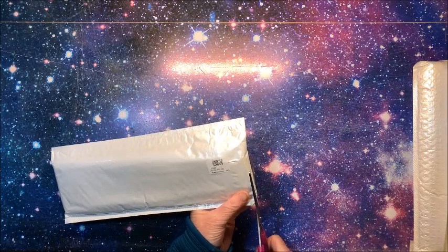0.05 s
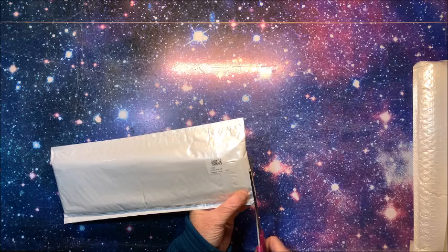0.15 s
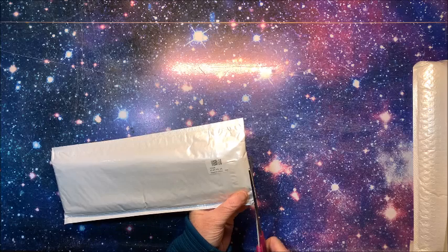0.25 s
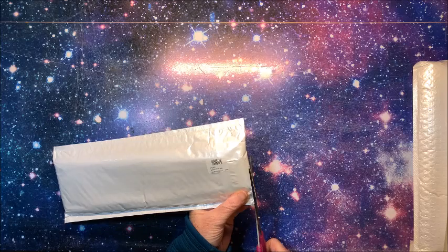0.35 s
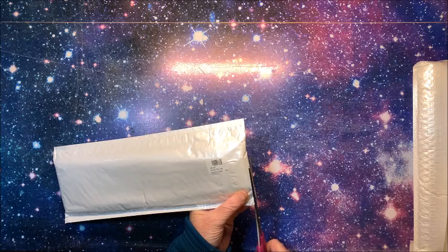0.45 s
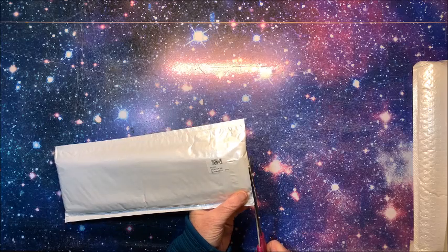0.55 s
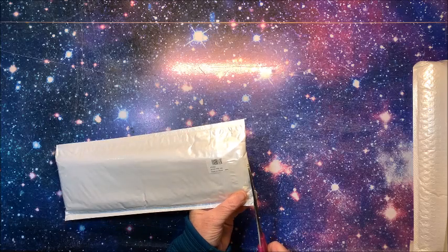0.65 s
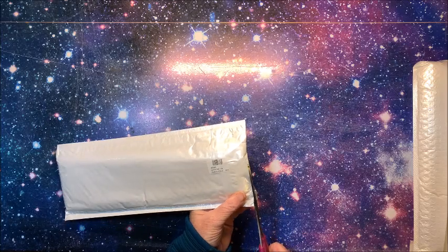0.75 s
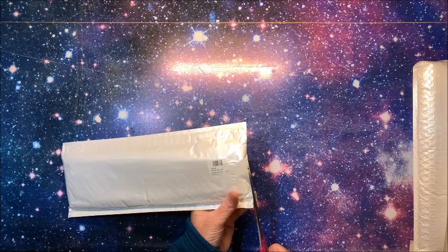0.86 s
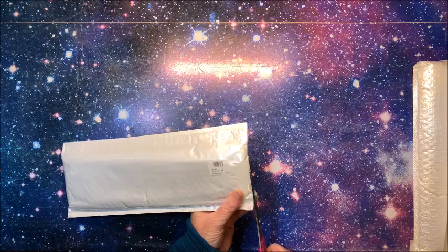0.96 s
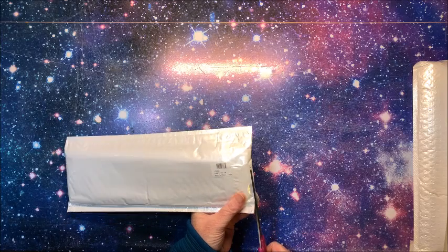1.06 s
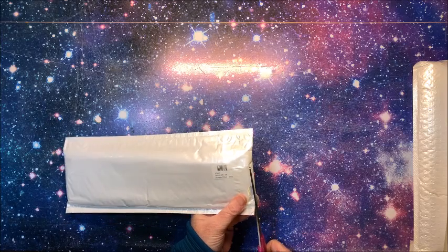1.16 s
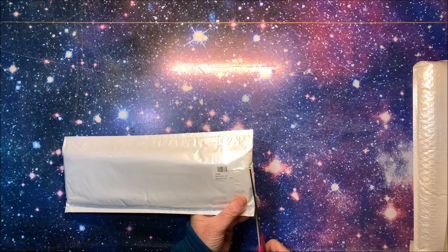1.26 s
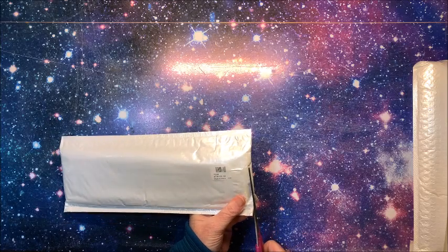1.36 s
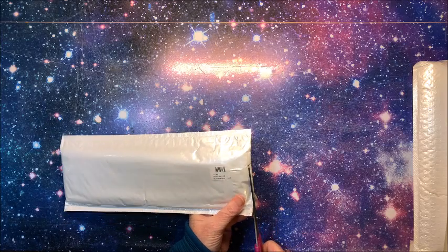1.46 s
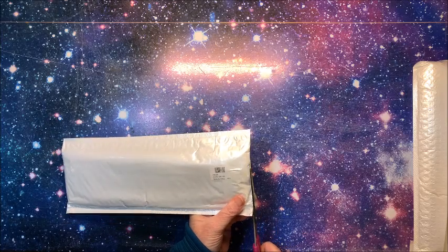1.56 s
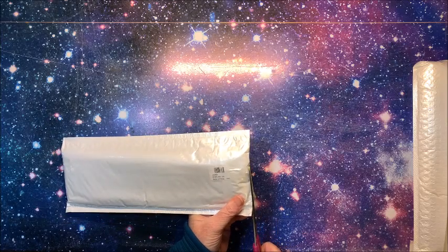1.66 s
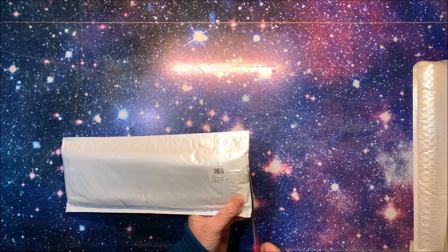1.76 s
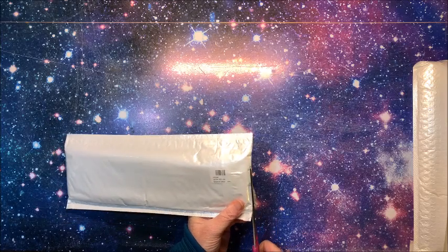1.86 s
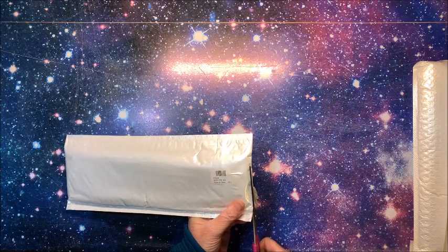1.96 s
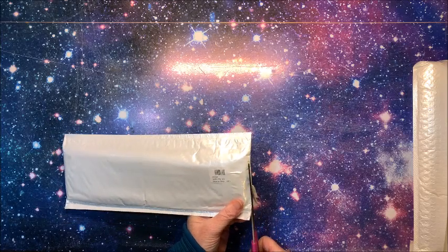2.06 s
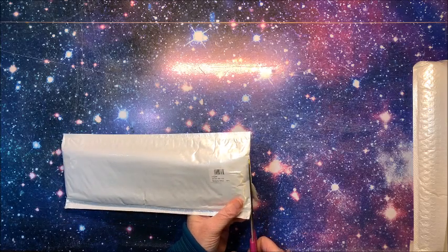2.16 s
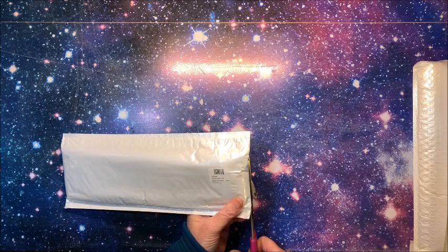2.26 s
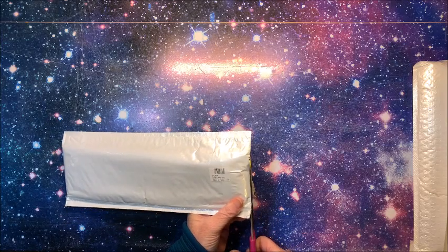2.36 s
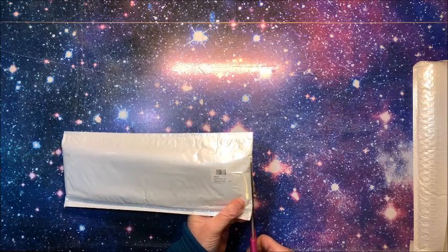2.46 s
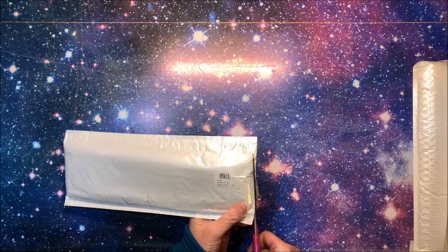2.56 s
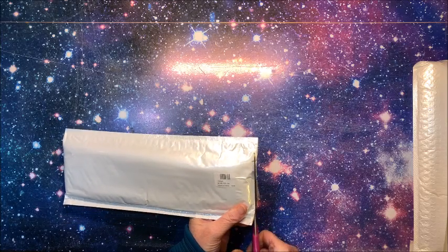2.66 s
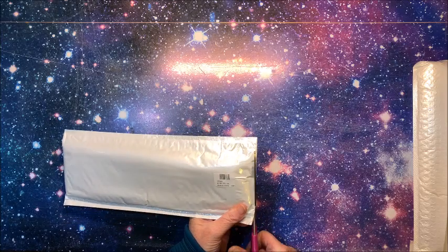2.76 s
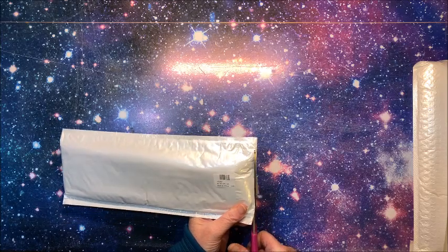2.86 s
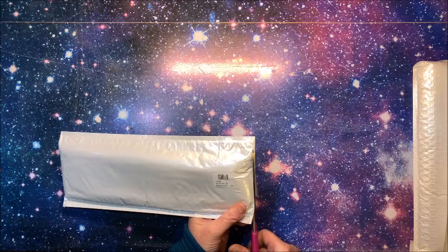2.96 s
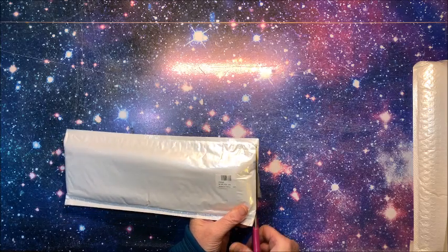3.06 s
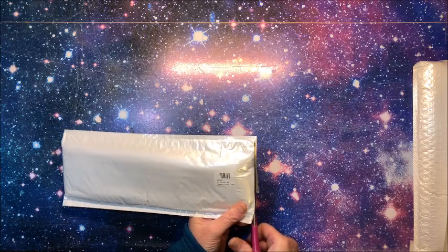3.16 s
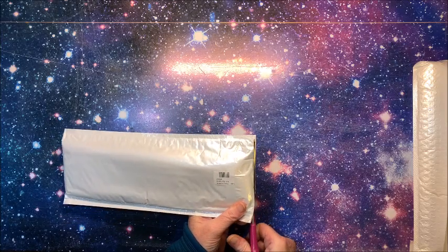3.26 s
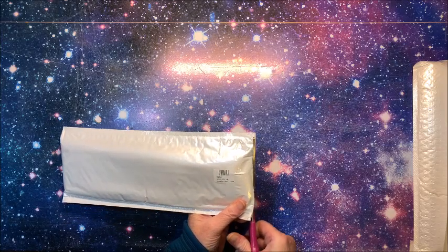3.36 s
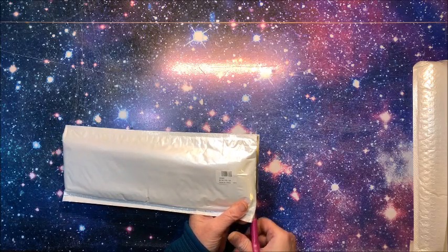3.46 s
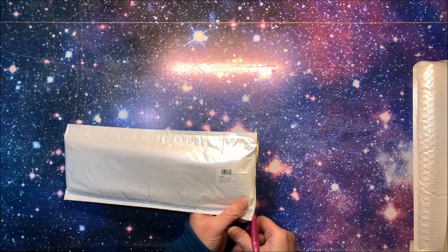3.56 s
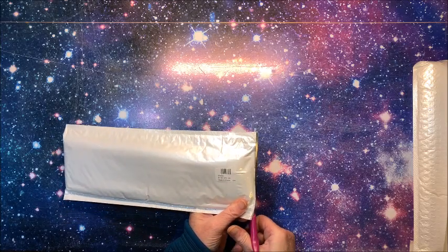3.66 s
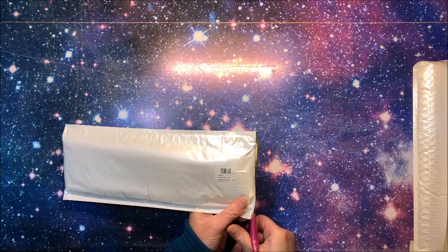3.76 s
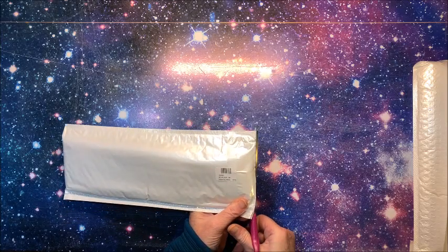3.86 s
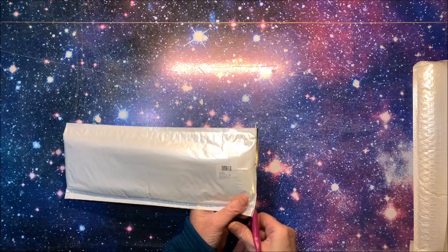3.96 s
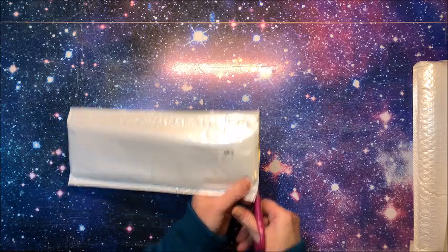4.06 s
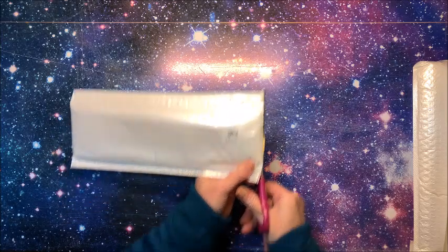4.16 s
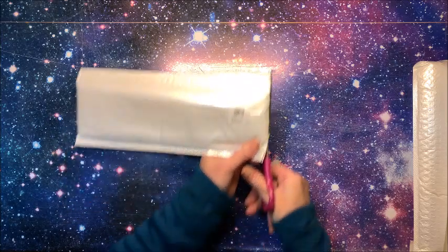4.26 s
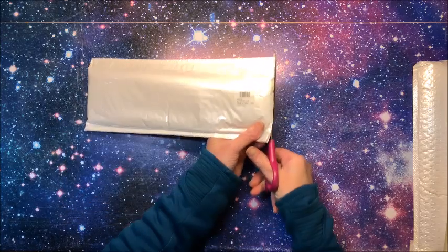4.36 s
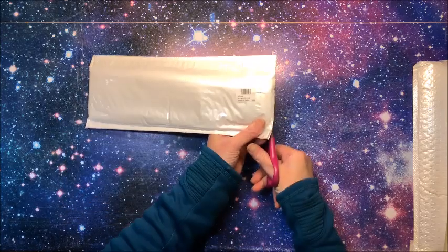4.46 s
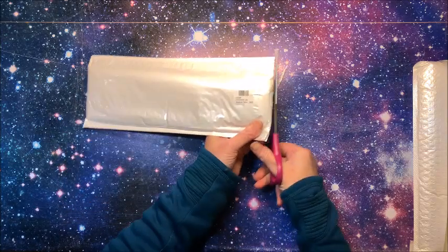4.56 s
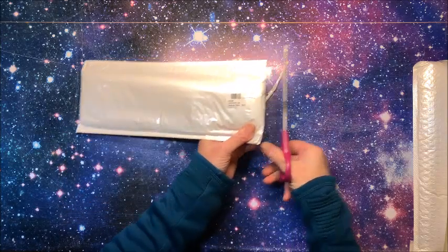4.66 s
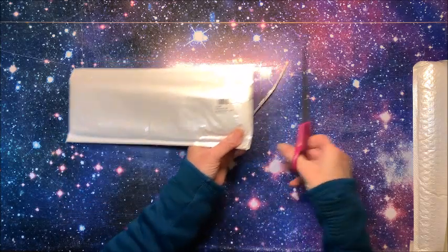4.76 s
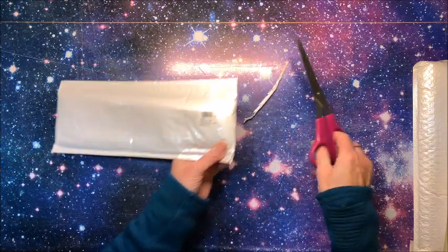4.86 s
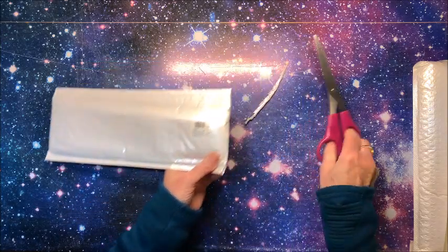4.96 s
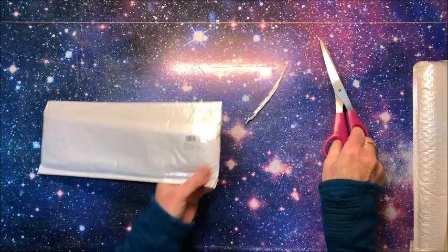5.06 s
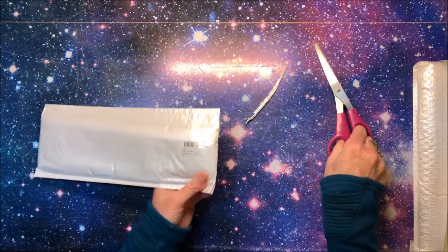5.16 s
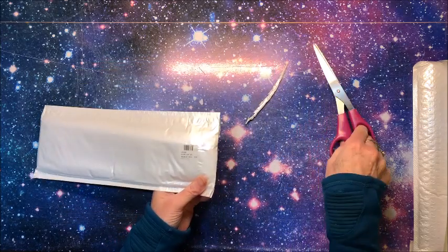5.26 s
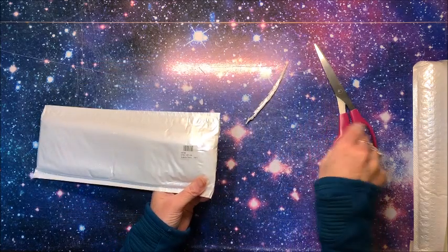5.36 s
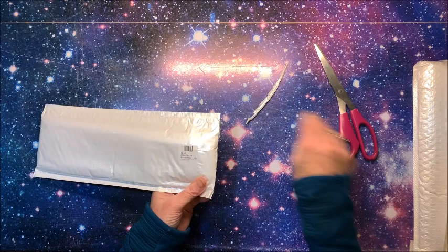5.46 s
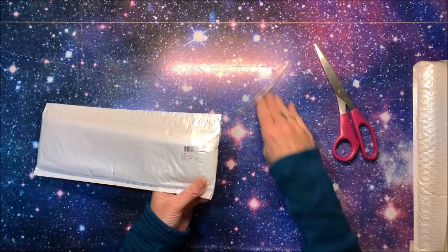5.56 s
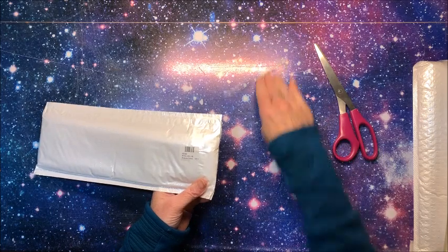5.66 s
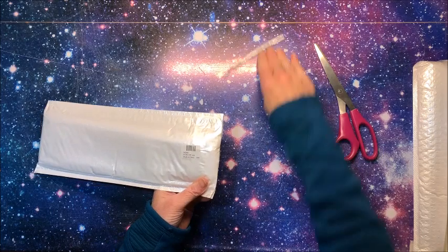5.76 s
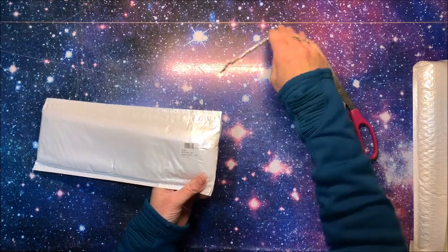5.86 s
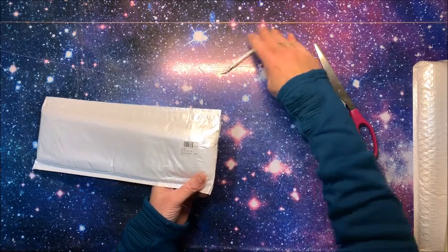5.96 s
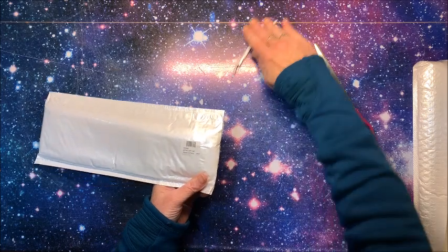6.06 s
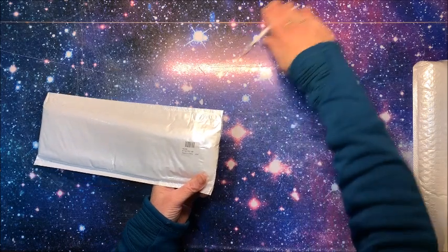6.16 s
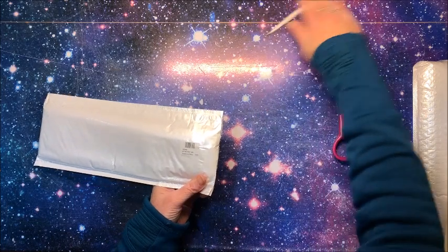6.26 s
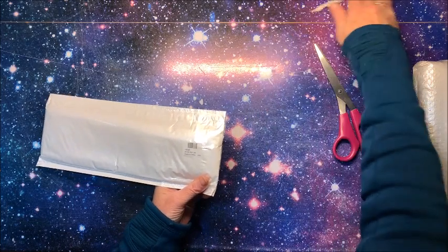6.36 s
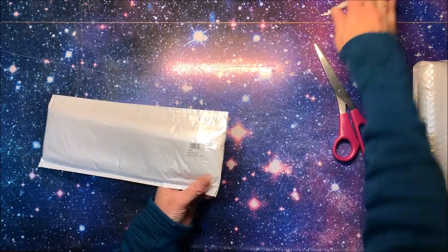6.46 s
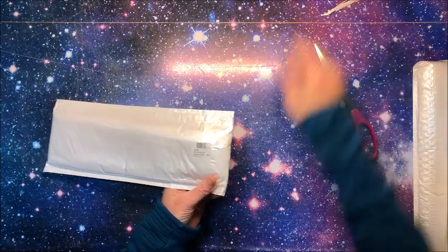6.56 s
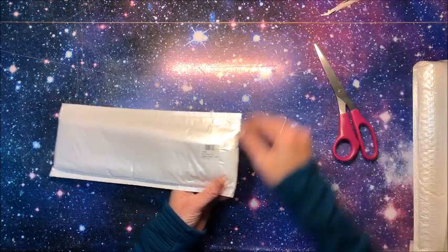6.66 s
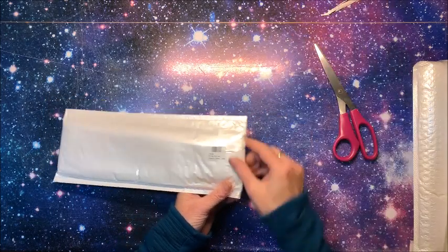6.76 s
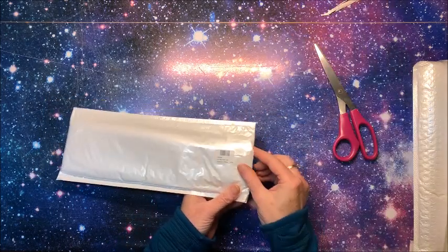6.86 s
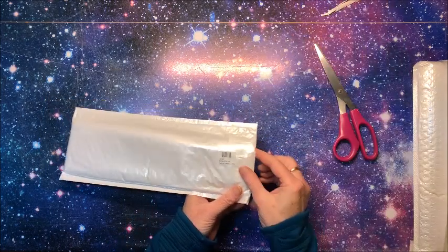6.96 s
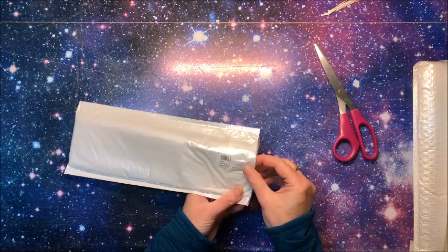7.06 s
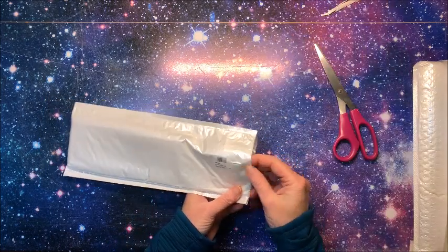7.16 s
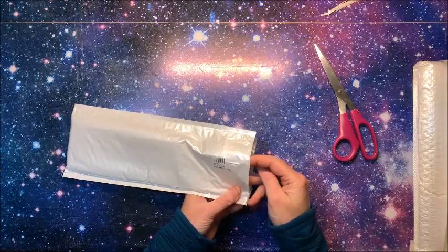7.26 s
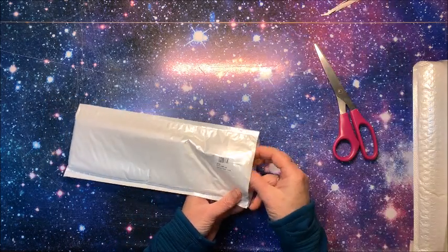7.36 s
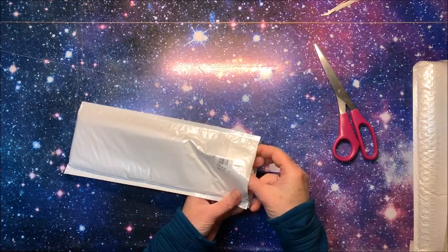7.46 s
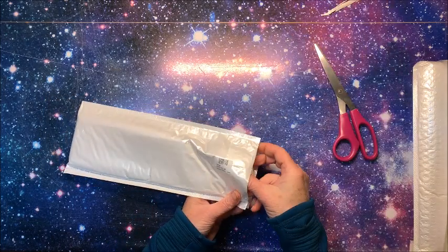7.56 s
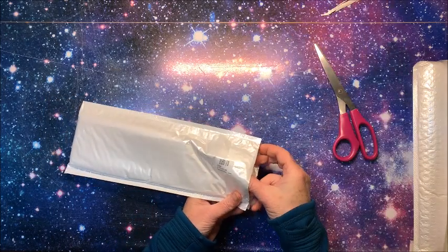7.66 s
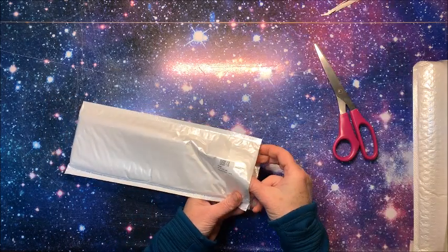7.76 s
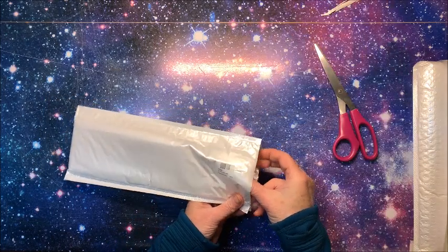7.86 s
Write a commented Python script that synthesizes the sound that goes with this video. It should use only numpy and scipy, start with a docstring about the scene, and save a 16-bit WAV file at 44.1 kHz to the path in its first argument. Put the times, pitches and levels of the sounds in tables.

```python
"""Scissors work along the edge of a plastic padded mailer held over a table, close to a microphone.
The film rustles (ringing slips over noise, shaped by level curves) and snaps (short dying rings).
Mailer and scissors knock on the table (noise-struck modes); a hand sweeps the cut strip away
(brushed noise) and opens the mailer (noise through resonances). The table shudders softly.
Reflections follow, and a quiet room hums behind (coloured noise, two beating tones)."""
import sys
import numpy as np
from scipy import signal
from scipy.fft import rfft, irfft, next_fast_len
from scipy.io import wavfile
from scipy.ndimage import uniform_filter1d

SR = 44100
rng = np.random.default_rng(int(sys.argv[2]) if len(sys.argv) > 2 else 0)


def int16_out(signal):
    """Quantize to a 16-bit WAV file."""
    q = np.round(np.clip(np.atleast_2d(signal).T, -1, 1) * 32767)
    wavfile.write(sys.argv[1], SR, q.astype(np.int16))


N = 348257
EDGE_HZ = 16200  # upper band limit

# spectrum of the fine fizz of the film: hz, relative_db_per_hz
FIZZ_SPECTRUM = [(3500, -24), (4600, -4), (6000, -3), (6800, 1), (7600, -5), (10500, -7), (13000, -14),
                 (16000, -20)]
# spectrum of its larger creases: hz, relative_db_per_hz
CREASE_SPECTRUM = [(1200, 1.5), (1700, -1), (2500, 3.5), (4000, 6), (5200, -9.5)]


def rustle():
    """Clumped tiny slips over a fine hiss sound as fizz, creases, padding and a pinched air pocket."""
    # padding: hz, relative_db_per_hz
    padding_spectrum = [(200, -10), (350, 4.5), (550, 4), (750, 5), (1050, 0.5), (1350, -0.5),
                        (1900, -21.5)]
    # fizz of film pried open by fingers: hz, relative_db_per_hz
    pried_spectrum = [(3000, -10.5), (4000, -2.5), (5000, 0.5), (6500, -0.5), (8200, 2.5), (9500, -3),
                      (12000, -6.5), (16000, -32)]
    # air pocket pinched in a crunch: time_s, pitch_hz
    pocket_pitch = [(.5, 696), (.72, 1010), (1.56, 570), (1.85, 730), (2.03, 524), (2.2, 1070), (2.45, 744),
                    (2.72, 554), (2.86, 1180), (3.0, 600), (3.06, 900), (3.2, 730), (3.25, 1100),
                    (3.3, 1110), (3.42, 760), (3.46, 630), (3.9, 554), (6.65, 740), (6.71, 1150),
                    (6.75, 610), (7.9, 690)]
    pry_s = 6.6  # from here on fingers, not blades, work the film
    pocket_width_hz, pocket_share = 360, 0.7

    s, (fizz_db, crease_db, pinched_db, loose_db) = friction()
    shared = evened(uniform_filter1d(rng.standard_normal(N), 250))
    drives = []
    for spectrum, grain in zip((FIZZ_SPECTRUM, CREASE_SPECTRUM, padding_spectrum), (0.48, 0.4, 0.2)):
        own = evened(uniform_filter1d(rng.standard_normal(N), 500))
        clumps = amp(2.2 * shared + 1.8 * own)
        grains = grain * slips(spectrum)
        hiss = (1 - grain) * rng.standard_normal(N)
        drives.append(clumps * (grains + hiss))
    fizz_drive, crease_drive, padding_drive = drives

    t = np.arange(N) / SR
    cut, pried = coloured(fizz_drive, FIZZ_SPECTRUM), coloured(fizz_drive, pried_spectrum)
    fizz = patchy(np.where(t < pry_s, cut, pried))
    creases = patchy(coloured(crease_drive, CREASE_SPECTRUM))
    padding = coloured(padding_drive, padding_spectrum)
    hz = np.interp(t, *np.transpose(pocket_pitch))
    pocket = resonate(padding_drive, hz, pocket_width_hz)
    pocket = evened(resonate(pocket, hz, pocket_width_hz))
    pinched = evened(pocket_share * pocket + (1 - pocket_share) * padding)
    return (played(fizz, s, fizz_db) + played(creases, s, crease_db)
            + played(padding, s, loose_db) + played(pinched, s, pinched_db))


def friction():
    """Level curves of fizz, creases, pinched and loose padding: handling plus crunches, summed as power."""
    # continuous handling rustle of the film, soft at first and louder near the end:
    # time_s, fizz_db, crease_re_fizz_db, loose_padding_re_fizz_db
    handling = [(0, -64, -0.5, -2), (.08, -70, -8, 1), (.45, -65.5, -17, -6.5), (1.1, -67.5, 1.5, 1),
                (1.75, -63, -9, -4), (2.33, -69.5, -10, -8), (2.9, -63.5, -4, -5.5), (3.38, -76, 2.5, -10),
                (3.7, -60.5, -2, 3), (4.15, -66, -3.5, 1.5), (4.6, -65, -9.5, -19), (5.05, -67, 0, -3.5),
                (5.65, -65.5, -3, -1), (5.95, -76.5, 0.5, -3), (6.55, -67.5, -5.5, -5),
                (6.85, -57, -2.5, -4.5), (7.25, -54, -7.5, -20), (7.5, -54, 0, 1.5),
                (7.64, -48.5, -12, -5.5), (7.79, -65, 7, 10.5), (7.89, -47, -16, -18)]
    # the blades close on the film or the fingers squeeze it:
    # start_s, length_s, start_fizz_db, end_fizz_db, crease_re_fizz_db, pinched_padding_re_fizz_db
    crunches = [(0.49, 0.13, -62.5, -61, -2.5, -10), (0.674, 0.071, -48.5, -60.5, -9.5, -11),
                (0.736, 0.056, -50, -58.5, -4, -13), (0.81, 0.025, -51.5, -55, 2, -9),
                (0.902, 0.34, -54.5, -65, -5.5, -19), (1.33, .17, -64, -49, -4, -11),
                (1.539, .13, -54, -60, -5.5, -14.5), (1.809, .14, -54, -50, -1, -7.5),
                (2.104, 0.027, -45.5, -50, -6, -6.5), (2.169, 0.079, -50, -46.5, -7, -8),
                (2.417, 0.3, -52.5, -63.5, -3, -9.5), (2.67, 0.16, -60, -57, 0, -1.5),
                (2.78, 0.076, -48, -50, -7.5, -4), (3.009, 0.074, -53.5, -44.5, -8.5, -7.5),
                (3.201, 0.06, -56, -43, -4, -4.5), (3.42, 0.051, -50.5, -47, -9, -9.5),
                (3.553, 0.053, -59.5, -57.5, -0.5, -13), (3.824, 0.013, -40, -56.5, 0, -15),
                (3.885, 0.01, -36, -57, -3.5, -12), (4.285, 0.017, -45.5, -56.5, -11, -13),
                (4.324, 0.092, -67, -54, -1.5, -7.5), (4.445, 0.0098, -39, -50.5, 3, -9.5),
                (6.64, 0.073, -56, -56, -5, -10), (6.734, 0.054, -44, -55, -7, -9.5),
                (6.794, 0.06, -56, -63, -2.5, -17), (6.87, 0.048, -59, -67, -10, -10),
                (7.012, 0.073, -46.5, -54.5, -4, -12), (7.094, .11, -51.5, -44, -4.5, -9.5),
                (7.269, 0.053, -46.5, -52.5, -5, -17), (7.334, 0.12, -53, -54, -1.5, -12),
                (7.517, 0.014, -36, -50, -2, -15), (7.819, 0.035, -46.5, -49.5, -1.5, -21)]
    bite_db_per_s, let_go_db_per_s = 4500, 413  # sets in at once, dies away more slowly

    t = np.arange(0, N, 64) / SR
    s, fizz_db, crease_db, body_db = np.transpose(handling)
    fizz, crease, loose = (amp(np.interp(t, s, fizz_db + db)) ** 2 for db in (0, crease_db, body_db))
    power = np.array([fizz, crease, np.full(len(t), 1e-15)])
    for start, length, from_db, to_db, crease_db, body_db in crunches:
        db = np.interp(t, [start, start + length], [from_db, to_db])
        db = db - bite_db_per_s * np.maximum(start - t, 0)
        db = db - let_go_db_per_s * np.maximum(t - start - length, 0)
        power += amp(db + np.array([[0], [crease_db], [body_db]])) ** 2
    return t, 10 * np.log10([*power, loose])


def slips(spectrum):
    """Sparse slips of uneven size; each patch of film rings a few cycles at a pitch of its own."""
    slips_per_s, ring_cycles = 1200, 4.9  # cycles to -60 dB
    sizes = amp(5 * np.minimum(rng.exponential(1, N), 2.9)) * (rng.random(N) < slips_per_s / SR)
    pitches = np.geomspace(spectrum[1][0], spectrum[-2][0], num=8)
    patch, t = rng.integers(0, len(pitches), N), np.arange(1024) / SR
    out = np.zeros(N)
    for k, hz in enumerate(pitches):
        grain = hz * ring(t, hz, ring_cycles / hz)
        out += signal.oaconvolve(sizes * (patch == k), grain)[:N]
    return evened(out)


def patchy(x):
    """Random patches of time and frequency rise and fall, shifting the colour of the film."""
    patch_db = 2.5  # standard deviation
    z = signal.stft(x, nperseg=256)[2]
    patches = uniform_filter1d(rng.standard_normal(z.T.shape), size=8, axis=0)
    patches = uniform_filter1d(patches, size=9, axis=1).T
    return evened(signal.istft(z * amp(patch_db * patches / patches.std()), nperseg=256)[1][:N])


def snaps():
    """Each crease rings a few cycles with an undertone, gives way again, tears, thuds and crackles on."""
    # loudest creases of the film flipping over: time_s, level_db, ringing_hz
    large = [(0.174, -34, 9000), (0.352, -35, 8360), (0.4853, -32, 7650), (.4998, -32, 9700),
             (0.6756, -20.5, 6150), (0.7684, -26.5, 9000), (0.811, -26, 7450), (0.8302, -32, 5930),
             (0.907, -26, 3430), (0.9368, -24, 7400), (0.974, -29, 6900), (1.2231, -22, 6170),
             (1.4127, -27.5, 7000), (1.433, -31.5, 6750), (1.485, -24, 4460), (1.5199, -19.5, 6700),
             (1.5226, -21.5, 6030), (1.5988, -29, 6300), (1.6178, -27, 5560), (1.6558, -22.5, 7150),
             (1.671, -25, 7340), (1.777, -31.5, 7600), (1.8017, -29.5, 7900), (1.8309, -23, 6630),
             (1.8504, -23, 6640), (1.9367, -24.5, 6450), (2.09, -34, 7100), (2.1074, -21, 6300),
             (2.1759, -18.5, 7400), (2.18, -15, 6700), (2.2163, -25.5, 6640), (2.2491, -18.5, 7660),
             (2.57, -18.5, 6200), (2.672, -37, 3680), (2.7024, -26.5, 5760), (2.7175, -35, 2430),
             (2.72, -26.5, 7040), (2.7597, -28.5, 6040), (2.8068, -24, 6000), (2.817, -28, 5900),
             (2.8397, -26, 7750), (2.8555, -32, 3400), (2.9246, -39.5, 4100), (2.9615, -38, 4950),
             (2.9974, -27.5, 6950), (3.0019, -19.5, 6500), (3.0814, -22, 5740), (3.2334, -21, 6770),
             (3.2595, -31, 6500), (3.327, -32, 5170), (3.385, -37, 9500), (3.4185, -21.5, 6640),
             (3.4845, -25.5, 6300), (3.6115, -31, 5340), (3.8247, -30.5, 5840), (3.87, -23.5, 6550),
             (3.8836, -16.5, 5360), (3.887, -29, 2060), (4.235, -35, 4300), (4.2927, -39, 6800),
             (4.4416, -19.5, 5140), (4.445, -22, 4330), (5.9962, -31, 9300), (6.4643, -24, 3860),
             (6.5611, -29, 3280), (6.644, -37, 2540), (6.6887, -28.5, 7540), (6.8908, -32.5, 6040),
             (6.956, -24.5, 4380), (7.018, -28.5, 4200), (7.045, -33, 3960), (7.1029, -21.5, 3780),
             (7.2902, -22.5, 7600), (7.3124, -31, 7050), (7.383, -28, 8600), (7.434, -32, 8350),
             (7.472, -23, 8650), (7.4786, -20.5, 3500), (7.5186, -20, 6660), (7.576, -30.5, 4000),
             (7.5964, -24, 4280), (7.725, -28, 4260), (7.8554, -22.5, 6300)]
    small_count, small_hz, small_octaves = 420, 6200, 0.53
    small_re_fizz_db, small_spread_db = 12, 6
    # levels re the snap
    undertone_db, resnap_db, resnap_max_s = -15, -7, 0.0022
    crackle_db, crackle_spread_db, crackle_t60_s = -26, 3.5, 0.046
    burst_db, burst_spread_db, burst_t60_s = -11.5, -2, 0.0031

    out, t = np.zeros(N), np.arange(900) / SR
    at, levels = friction()
    when = rng.uniform(0, N / SR, small_count)
    size, pitch = rng.standard_normal((small_count, 2)).T
    small_db = np.interp(when, at, levels[0]) + small_re_fizz_db
    small_db = small_db + small_spread_db * np.minimum(size, 0.5)
    hz = np.minimum(small_hz * 2 ** (small_octaves * pitch), EDGE_HZ)
    rows = [*np.transpose([when, small_db, hz]), *large]

    noise, chance = rng.standard_normal((len(rows), len(t))), rng.random((len(rows), 4))
    hisses, tears = coloured(noise, FIZZ_SPECTRUM), coloured(noise, CREASE_SPECTRUM)
    for (s, db, hz), n, hiss, tear, (low, *lags) in zip(rows, noise, hisses, tears, chance):
        u = t * hz / 0.6  # envelope peaks at 0.6 cycle
        tones = np.sin(2 * np.pi * hz * t) + 0.19 * np.sin(2 * np.pi * 2.82 * hz * t)
        first = u * np.exp(1 - u) * tones
        first += amp(undertone_db) * ring(t, hz * (0.2 + 0.44 * low), 0.003)
        tick = first.copy()
        # three repeats at random short delays, at three fixed falling levels, random sign
        for k, lag in enumerate(lags):
            again = np.interp(t - resnap_max_s * lag, t, first, left=0)
            tick += amp(resnap_db * (1 + k)) * np.sign(n[k]) * again
        crackle = amp(crackle_db + crackle_spread_db * n[-1] - 60 * t / crackle_t60_s) * hiss
        burst = amp(burst_db + burst_spread_db * n[-1] - 60 * t / burst_t60_s) * evened(hiss[::-1] + tear)
        thud = amp(-39) * ring(t, 733, 0.096)
        add(out, s - 1 / hz, amp(db) * (tick + burst + crackle + thud))
    return out


def pops():
    """Pockets of the padding give way with a hollow pop, a ring of few cycles."""
    # time_s, level_db, pitch_hz
    pockets = [(2.469, -26.5, 1200), (3.081, -32.5, 706), (3.884, -22.5, 566), (6.645, -30, 734),
               (6.697, -26.5, 1140), (6.701, -25.5, 930), (7.178, -24, 940), (7.526, -25, 1200),
               (7.5968, -17, 850)]
    cycles_to_60_db = 4.2
    out, t = np.zeros(N), np.arange(900) / SR
    for s, db, hz in pockets:
        onset = np.minimum(2 * t * hz, 1)
        add(out, s, amp(db) * ring(t, hz, cycles_to_60_db / hz) * onset)
    return out


def knocks():
    """Each blow sounds the wood, rattles the blades, dents the padding and swells the hollow below."""
    # blows on the table: time_s, wood_db, steel_db, rattle_t60_s, bump_db, bump_hz, boom_db,
    # wood_tone_hz (nearest the blow); levels relative within each layer
    blows = [(1.127, -49.5, -36, 0.026, -33, 188, -64, 400), (1.16, -55, -77, 0.044, -28, 193, -90, 400),
             (4.7557, -30.5, -26, 0.014, -18.5, 310, -42.5, 1000),
             (4.7658, -48, -59, 0.04, -21, 276, -70, 800),
             (5.1414, -23.5, -24.5, 0.074, -26.5, 250, -29, 540),
             (5.289, -24, -18, 0.081, -25, 260, -35, 526), (5.310, -27.5, -30.5, 0.16, -45, 250, -48, 600),
             (5.335, -22, -17.5, 0.15, -48, 250, -30, 650), (5.3425, -21.5, -14, 0.044, -30, 248, -57, 650),
             (5.3824, -25, -16.5, 0.19, -50, 250, -34.5, 560), (5.393, -20, -17, 0.038, -48, 250, -48, 700),
             (5.417, -26, -19, 0.047, -42, 250, -50, 448), (5.438, -30.5, -25.5, 0.038, -57, 250, -62, 750),
             (5.451, -26, -38, 0.062, -41, 250, -40.5, 686), (5.495, -40, -56, 0.04, -32, 250, -53, 530),
             (6.015, -49.5, -53, 0.4, -44, 300, -38.5, 400)]
    # table top: mode_hz, level_db, t60_s
    wood_modes = [(208, -3.5, 0.05), (272, -4.5, 0.074), (400, -3.5, 0.02), (440, 0, 0.036),
                  (525, -1, 0.062), (659, 4, 0.025), (810, -5.5, 0.018), (1023, -3, 0.029),
                  (1200, -4.5, 0.058), (1290, -13, 0.09), (1655, 3, 0.019)]
    # rattle of the blades: hz, relative_db_per_hz
    rattle_spectrum = [(530, -31), (900, 7.5), (1640, -2), (1810, 6), (2140, 12.5), (2830, 6), (3550, 7),
                       (5820, 9.5), (11700, -0.5), (16000, -15)]
    # ringing of the blades: mode_hz, level_db, t60_s
    blade_modes = [(1680, -7, .04), (2170, -4.5, 0.041), (2570, -7, .07), (4040, 5, 0.04),
                   (5650, -3, 0.041), (7100, -10, 0.032)]
    wood_db_per_octave = 7.5  # modes far from the tone of a blow are weaker
    boom_hz, boom_rise_s = 119, 0.054  # hollow under the table, slow to build up

    out, t = np.zeros(N), np.arange(SR // 2) / SR
    crack = amp(-2 - 60 * t / 0.009)  # first contact
    spread = rng.standard_normal((len(blows), len(wood_modes)))
    noise = rng.standard_normal((len(blows), len(t)))
    for (s, wood_db, steel_db, t60, bump_db, hz, boom_db, tone_hz), places, n in zip(blows, spread, noise):
        wood = np.zeros(len(t))
        # each blow lands elsewhere and so weighs and bends the modes anew
        for (f, db, decay), p in zip(wood_modes, places):
            mode_db = db + 2 * p - wood_db_per_octave * abs(np.log2(f / tone_hz))
            wood += amp(mode_db) * np.sign(p) * ring(t, f * (1 + 0.027 * p), decay)
        # the contact chatters, so a short rough burst drives the wood
        wood = struck(wood, n[::-1] * (amp(-60 * t / 0.12) + crack))

        rattle = coloured(n, rattle_spectrum) * (amp(-60 * t / t60) + crack)
        rattle = rattle * np.minimum(t / 0.0011, 1) / 2.4
        blades = np.zeros(len(t))
        for (f, db, decay), p in zip(blade_modes, places[::-1]):
            blades += amp(db + 2.2 * p) * ring(t, f, decay)
        taps = n ** 3 * amp(-60 * t / 0.016)
        steel = rattle + amp(-8) / 3.1 * struck(blades, taps)

        turns = 1.18 * (t * hz) ** 0.55  # the dent slackens, so its pitch sags
        bump = np.sin(2 * np.pi * turns) * amp(-9 * t * hz) * np.minimum(t * hz * 9.1, 1)
        u = t / boom_rise_s
        boom = (u * np.exp(1 - u)) ** 6.5 * np.sin(2 * np.pi * boom_hz * t)
        add(out, s, amp(wood_db) * wood + amp(steel_db) * steel + amp(bump_db) * bump + amp(boom_db) * boom)
    return out


def struck(modes, blow):
    """Modes excited by a rough blow, keeping their energy."""
    sound = signal.fftconvolve(modes, blow)[:len(modes)]
    return sound * np.linalg.norm(modes) / np.linalg.norm(sound)


def slide():
    """Fingers slide into the mailer: skin noise through the wavering, rising resonances of the opening."""
    # time_s, level_db
    level = [(7.58, -55), (7.63, -58), (7.7, -49.5), (7.8, -49), (7.9, -53.5)]
    # air in the open mailer: mean_hz, width_less_30_hz, level_db
    resonances = [(1960, 220, 0), (3050, 150, 2.5), (4050, 150, 7), (4870, 560, -5), (6300, 300, -1)]
    waver_share, rise_share_per_s = 0.0046, 0.1  # of the pitch

    start_s = level[0][0]
    t = np.arange(N - round(start_s * SR)) / SR
    skin, waver, swell = rng.standard_normal((3, len(resonances), len(t)))
    waver, swell = evened(uniform_filter1d(waver, 1500)), evened(uniform_filter1d(swell, 1200))
    sound = np.zeros(len(t))
    for (f, width, db), w, v in zip(resonances, waver, swell):
        hz = f * (1 + waver_share * w + rise_share_per_s * (t - t.mean()))
        sound += amp(db + 1.3 * v) * resonate(skin[0], hz, width + 30)
    out = np.zeros(N)
    add(out, start_s, evened(sound))
    return played(out, *np.transpose(level))


def sweep():
    """Hand and sleeve brush the table: fluttering coloured noise under a level curve."""
    # time_s, level_db
    level = [(5.97, -64), (6.046, -66.5), (6.172, -49), (6.268, -56.5), (6.406, -55), (6.45, -100)]
    # hz, relative_db_per_hz
    brush_spectrum = [(880, -56), (1500, -20), (4200, -16), (6830, 2), (10200, 1.5), (14900, -7),
                      (16000, -13)]
    flutter = amp(2.9 * evened(uniform_filter1d(rng.standard_normal(N), 300)))
    brush = coloured(flutter * rng.standard_normal(N), brush_spectrum)
    return played(brush, *np.transpose(level))


def shudders():
    """The whole table shudders softly: a low swell of two or three cycles."""
    # time_s, peak_db
    events = [(4.5, -57), (4.757, -50), (5.09, -53), (5.53, -48.5)]
    shudder_hz, rise_s = 52.5, 0.034
    out, t = np.zeros(N), np.arange(SR // 4) / SR
    u = t / rise_s
    for s, db in events:
        add(out, s, amp(db) * (u * np.exp(1 - u)) ** 2 * np.sin(2 * np.pi * shudder_hz * t))
    return out


def room(x):
    """Sparse reflections of random sign, each band dying at its own speed; the bass comes back weakly."""
    # hz, t60_s
    decay = [(200, 0.51), (1000, 0.14), (4000, 0.22), (12000, 0.015)]
    taps = np.zeros(SR // 2)
    at = np.arange(180, len(taps) - 20, 20)
    taps[at + rng.integers(0, 20, len(at))] = rng.choice([-1., 1.], len(at))
    hz, t, z = signal.stft(taps, SR, nperseg=256)
    tail = signal.istft(z * amp(-60 * t / read(decay, hz)[:, None]), SR, nperseg=256)[1]
    tail = signal.sosfilt(signal.butter(2, 280, "high", fs=SR, output="sos"), tail)
    return signal.fftconvolve(x, tail / np.linalg.norm(tail))[:N]


def air():
    """Steady coloured room noise that swells a little."""
    # hz, relative_db_per_hz
    air_spectrum = [(18, -35), (30, 6), (58, 5), (93, 3.5), (273, 5.5), (328, 1), (540, 6.5), (702, -12),
                    (822, -2), (1670, -16), (6550, -9.5), (12000, -21.5), (16000, -14)]
    swell = amp(1.8 * evened(uniform_filter1d(rng.standard_normal(N), 6000)))
    return amp(-65.5) * swell * coloured(rng.standard_normal(N), air_spectrum)


def hum():
    """Two low steady tones that beat."""
    # pitch_hz, rms_db
    tones = [(49.1, -79), (53.12, -75.4)]
    t = np.arange(N) / SR
    return sum(amp(db) * np.sqrt(2) * np.cos(2 * np.pi * hz * t) for hz, db in tones)


def amp(db):
    """Decibels to gain."""
    return 10 ** (np.asarray(db) / 20)


def evened(x):
    """Scales to rms 1."""
    return x / np.sqrt(np.mean(x ** 2, axis=-1, keepdims=True) + 1e-20)


def read(points, hz):
    """Reads a table on a log-frequency axis."""
    f, value = np.transpose(points)
    return np.interp(np.log(hz + 1), np.log(f + 1), value)


def add(mix, s, sound):
    """Mixes a sound in at s seconds."""
    part = mix[max(round(s * SR), 0):][:len(sound)]
    part += sound[:len(part)]


def played(sound, s, db):
    """Gives a sound of rms 1 a level curve, silent outside it."""
    return sound * amp(np.interp(np.arange(N) / SR, s, db, left=-150, right=-150))


def coloured(x, spectrum):
    """Filters by a spectrum and scales to rms 1."""
    count = x.shape[-1]
    size = next_fast_len(count)
    gain = amp(read(spectrum, np.fft.rfftfreq(size, 1 / SR)))
    return evened(irfft(rfft(x, size) * gain, size)[..., :count])


def ring(t, hz, t60):
    """A dying sine."""
    return np.sin(2 * np.pi * hz * t) * amp(-60 * t / t60)


def resonate(x, hz, width):
    """A resonance of gain 1 that follows the curve hz: shift down, one-pole low-pass, shift back."""
    turn = np.exp(2j * np.pi * np.cumsum(hz) / SR)
    r = np.exp(-np.pi * width / SR)
    return 2 * (turn * signal.lfilter([1 - r], [1, -r], x / turn)).real


def scene():
    """Everything on the table, its reflections and the room noise."""
    near = rustle() + snaps() + pops() + knocks() + slide() + sweep() + shudders()
    return (near + amp(-15.5) * room(near) + air() + hum())[None]


def record(dry):
    """The microphone loses the deepest bass; then the band limit."""
    lean = signal.sosfilt(signal.butter(3, 40, "high", fs=SR, output="sos"), dry)
    lowpass = signal.firwin(511, EDGE_HZ, window=("kaiser", 9), fs=SR)
    return signal.oaconvolve(lean, lowpass[None], "same")


dry = scene()
out = record(dry)
int16_out(out)
```